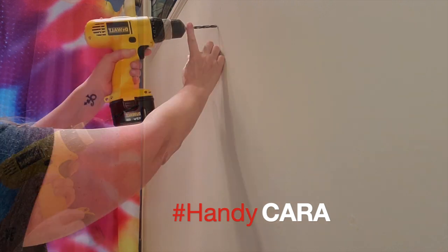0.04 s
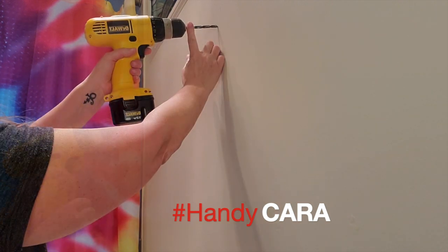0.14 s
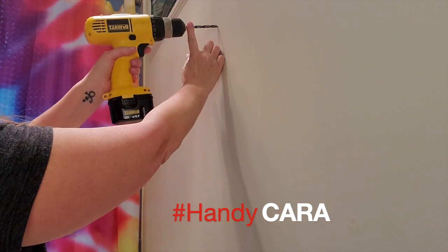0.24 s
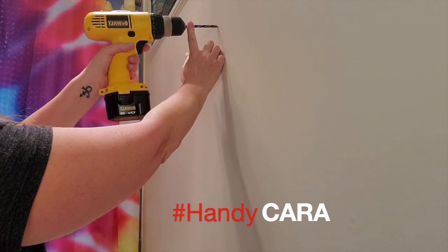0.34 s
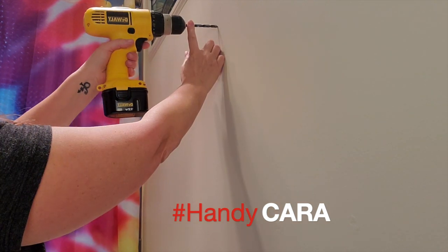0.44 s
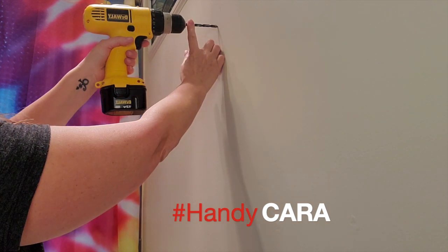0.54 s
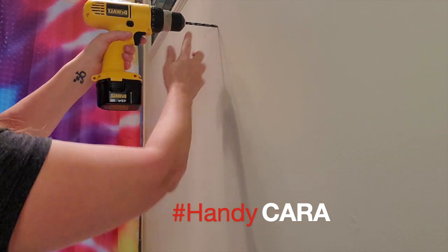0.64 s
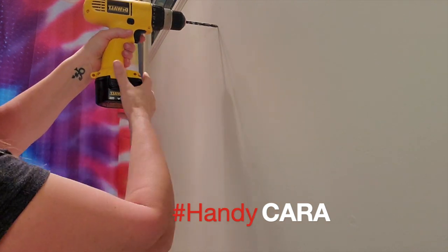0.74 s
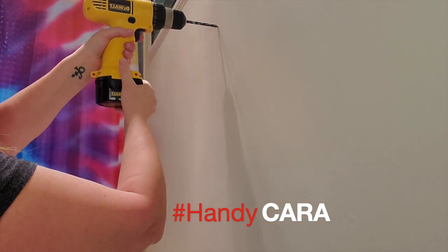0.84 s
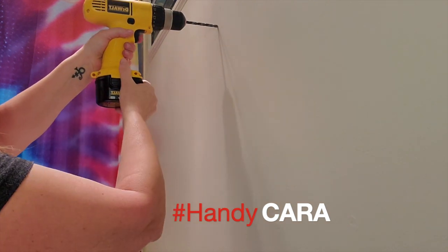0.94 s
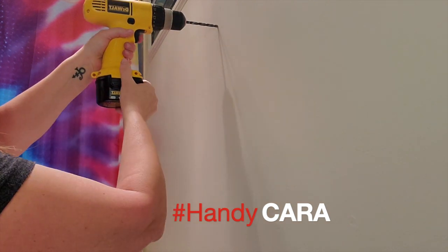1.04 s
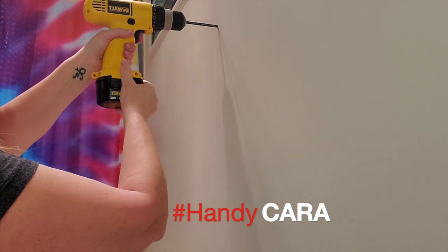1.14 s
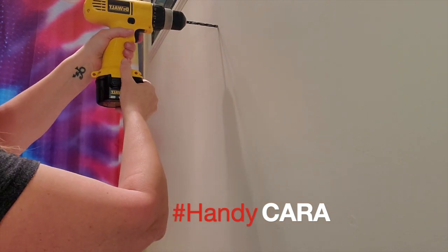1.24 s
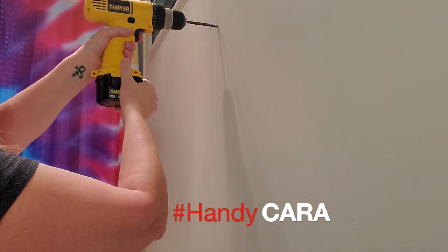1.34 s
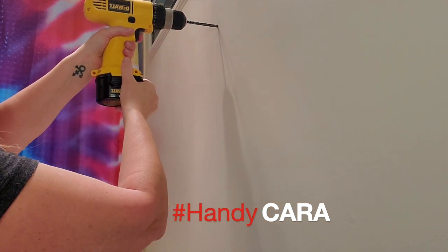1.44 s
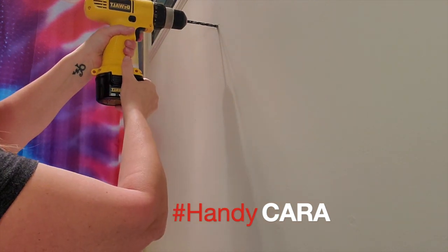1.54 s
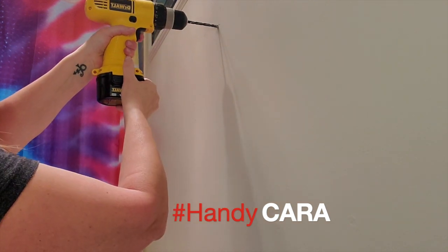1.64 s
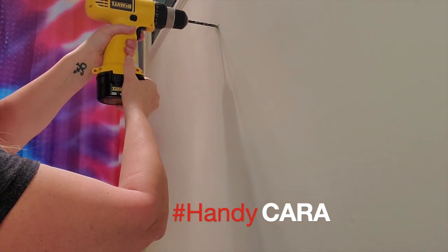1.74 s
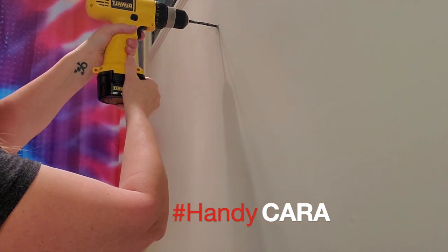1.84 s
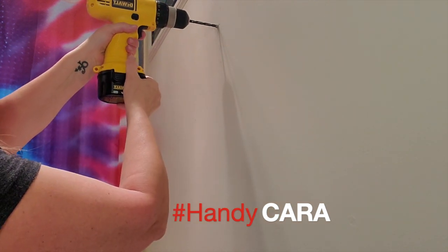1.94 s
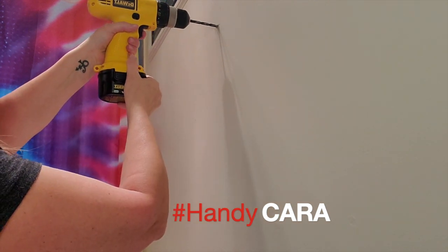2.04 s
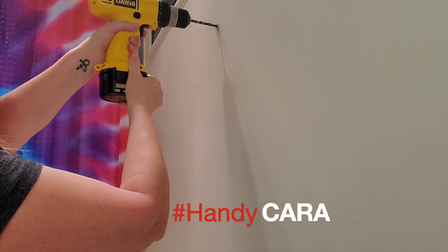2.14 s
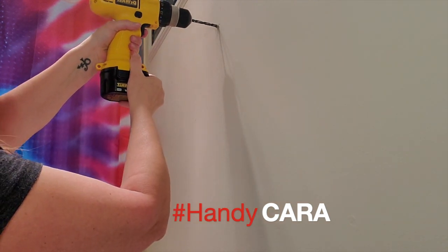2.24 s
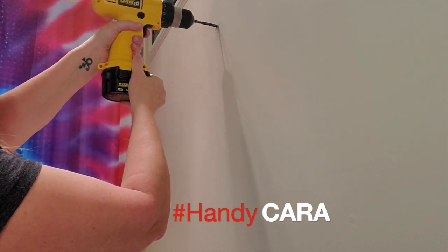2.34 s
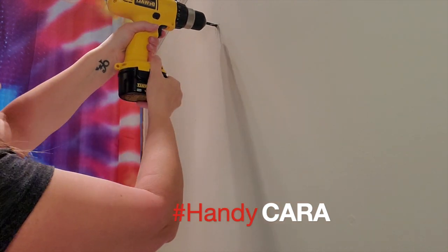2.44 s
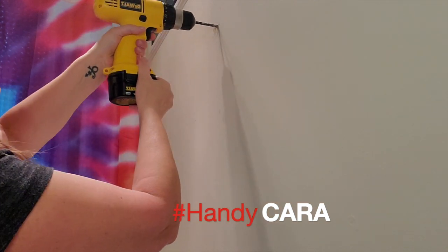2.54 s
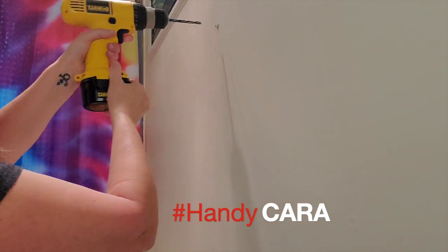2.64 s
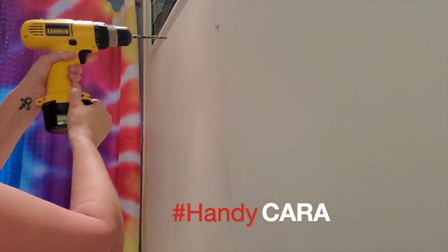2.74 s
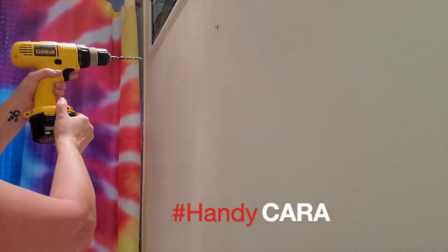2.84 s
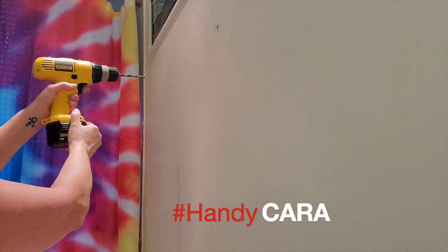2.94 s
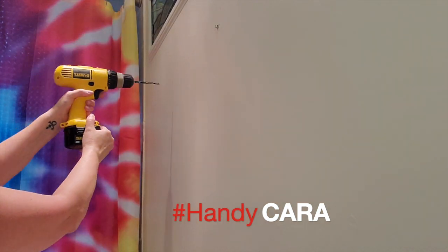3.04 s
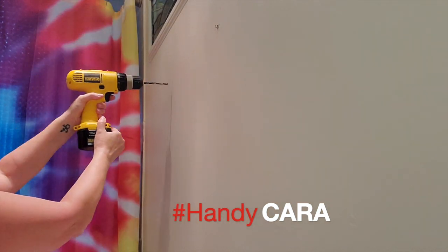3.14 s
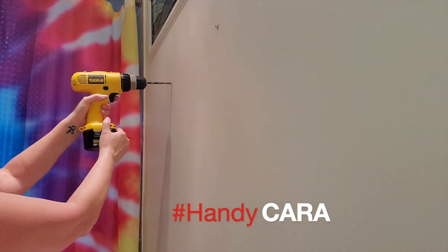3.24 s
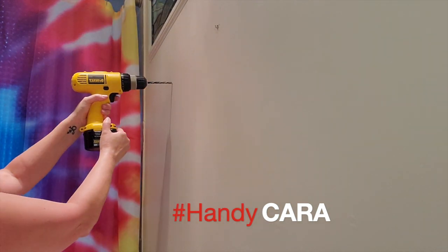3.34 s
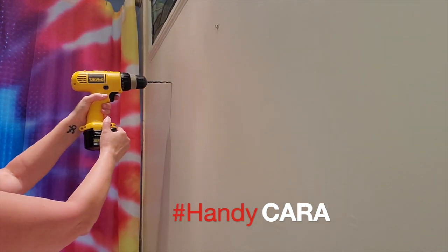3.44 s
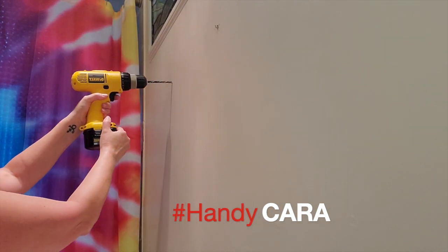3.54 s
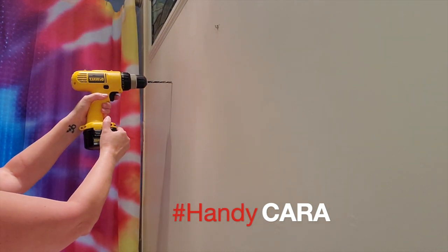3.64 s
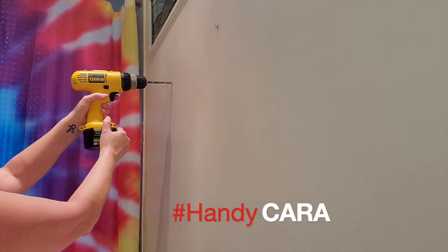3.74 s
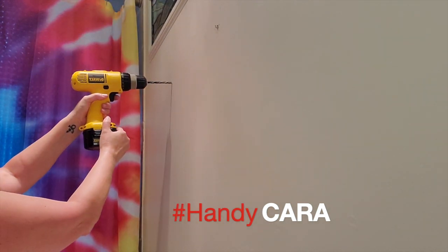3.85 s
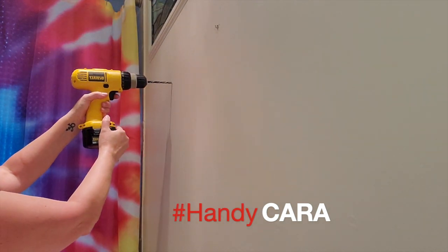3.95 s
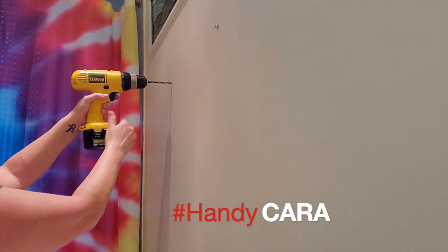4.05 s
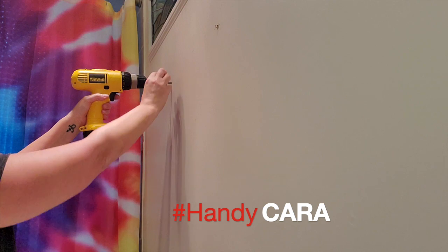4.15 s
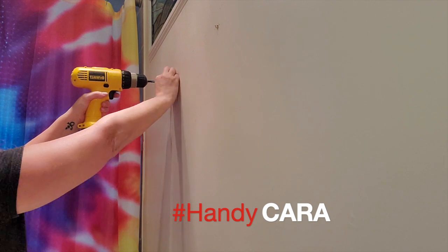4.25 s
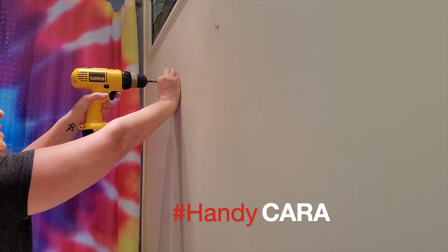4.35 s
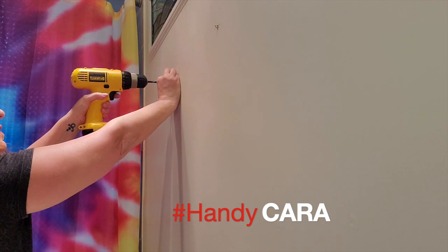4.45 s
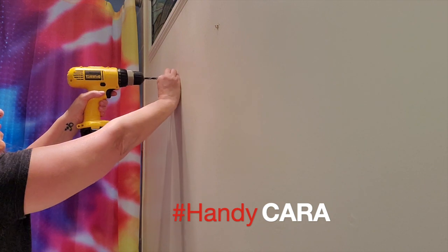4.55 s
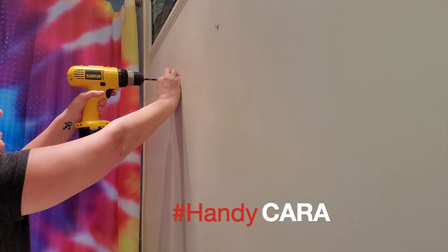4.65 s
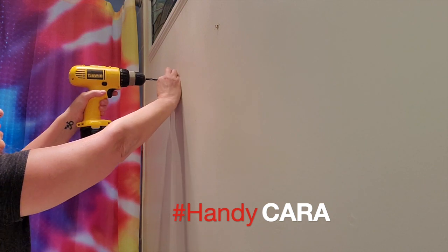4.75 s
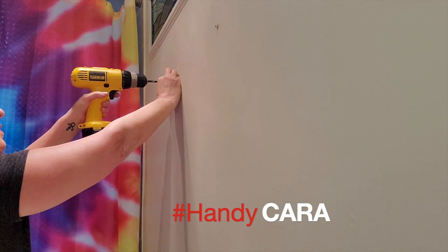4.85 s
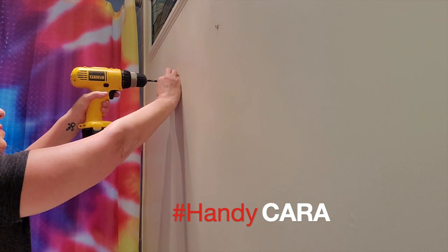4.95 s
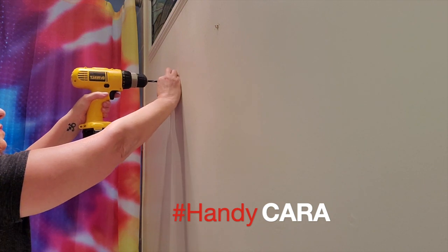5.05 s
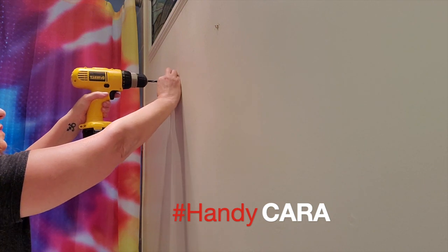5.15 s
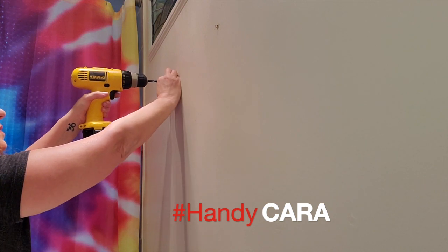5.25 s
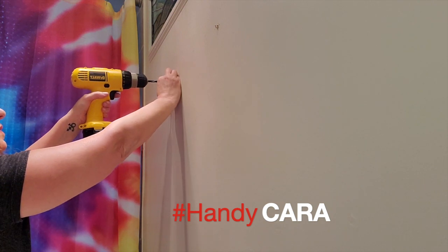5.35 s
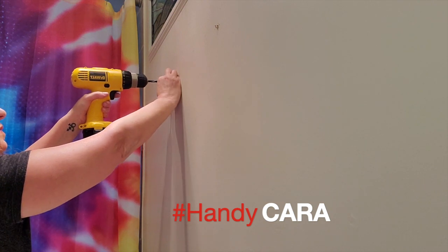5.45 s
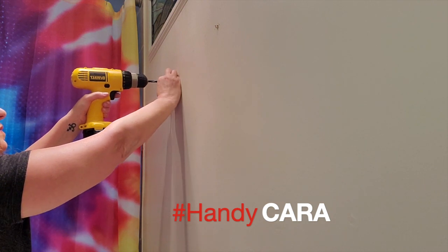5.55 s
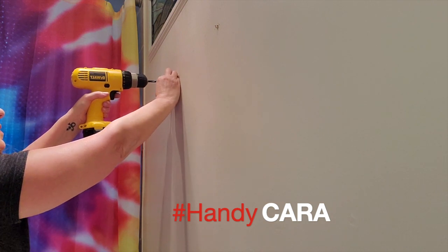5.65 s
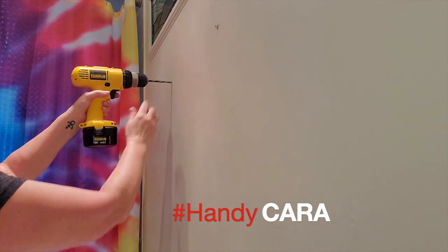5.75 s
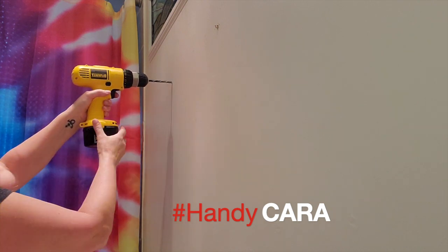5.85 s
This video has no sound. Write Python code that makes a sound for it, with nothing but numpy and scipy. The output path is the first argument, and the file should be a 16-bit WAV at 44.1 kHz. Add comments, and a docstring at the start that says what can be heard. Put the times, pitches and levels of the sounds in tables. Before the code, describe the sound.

In a small room, a cordless drill bores into plastic and stops, followed by hollow knocks, faint clicks and a small squeak.

```python
"""Small room: a cordless drill bores through a plastic sheet held against a wall.
The speed control whistles; fan, gears and shaft sing at multiples of the motor speed; dense tiny
impacts make the grinding. The sheet crunches, then judders as the bit breaks through. Shifted by hand,
it bumps the wall and rings, slides, and squeaks under a finger. The trigger is touched once more."""
import sys
import numpy as np
from scipy import signal
from scipy.fft import rfft, irfft
from scipy.io import wavfile
from scipy.ndimage import uniform_filter1d

SR = 44100
rng = np.random.default_rng(int(sys.argv[2]) if len(sys.argv) > 2 else 0)


def wrap_up_sound(samples):
    """Save the sound to the file named by the first command line argument, as 16-bit audio."""
    columns = np.atleast_2d(samples).T
    # keep every value between -1 and 1, then stretch to whole-number steps
    tamed = np.clip(columns, -1, 1)
    steps = np.round(tamed * 32767).astype(np.int16)
    wavfile.write(sys.argv[1], SR, steps)


N = 260537
T = np.arange(N) / SR
HZ = np.fft.rfftfreq(N, 1 / SR)

RUN_START_S, RUN_LENGTH_S, BRAKE_DB_PER_S = 0.828, 1.729, 660
BITE_LENGTH_S, PUSH_S, PUSH_RISE_S, THROUGH_S = 0.55, 1.9, 0.054, 2.38
START_HZ, CRUISE_HZ, GEAR_RATIO = 152.9, 376.6, 15.5
SQUEAK_S, SQUEAK_ATTACK_S = 4.694, 0.018
LOW_CUT_HZ, HIGH_CUT_HZ = 28, 15800

# Motor speed steps: t/s, target/Hz, lag/s
SPEED_STEPS = [(.83, 285.4, 0.16), (1.12, 369.1, 0.089), (1.63, 373.2, 0.061), (2.06, 411.5, 0.076),
               (2.38, 537.8, .035), (2.42, 385.7, 0.11)]
# Gear tones: order (multiple of motor speed), level/dB, offset before the bite/dB
GEAR_TONES = [(7.91, -14.5, -17), (9.95, -16, 6.5), (11.91, -1, 4.5), (12.66, 0, -2.5), (15.05, -10.5, -6),
              (22.1, -17, 12), (23.68, -6.5, 2), (24.93, 0, 5), (36.55, -6, -4), (39, -6, -1)]
# Tooth mesh: t/s, flutter/fraction of speed, gain above order 20/dB
GEAR_MESH = [(0.85, 0.008, -12), (1.33, 0.0057, -6.5), (1.45, 0.003, -2), (1.59, 0.0033, 1),
             (1.64, 0.0062, -6.5), (1.82, 0.0061, -2), (1.89, 0.0059, 2.5), (1.99, 0.0075, -8),
             (2.051, 0.0068, 0.5), (2.32, 0.006, 0.5), (2.43, 0.01, -8.5)]
# Planet wheel tones: order, level/dB
PLANET_TONES = [(0.87, -52.5), (1.74, -48), (2.6, -56.5), (3.25, -54.5), (3.46, -59.5)]
# Resonances of drill, bit and sheet: f/Hz, width/Hz, lift/dB
BODY_MODES = [(213.5, 37, 17.5), (690, 70, 6.5), (803, 32, 7), (996, 43, 6), (1190, 220, 7.5),
              (1557, 220, 10.5), (2497, 150, 8), (3650, 290, 5)]
# Housing resonances: f/Hz, width/Hz, lift/dB
HOUSING_MODES = [(221, 39, 9.5), (270, 35, 1.5), (407, 19, 10), (1295, 130, 19), (1662, 140, 23),
                 (2060, 140, 11.5), (2300, 150, 12)]
# Gear case resonances: f/Hz, width/Hz, lift/dB
GEAR_CASE_MODES = [(3900, 420, 8), (5080, 110, 9.5), (5960, 720, 0), (9100, 800, 7), (9900, 303, 9.5),
                   (10970, 650, 14.5), (11800, 500, 8.5), (14380, 400, 2.5)]
# Chuck and bit resonance: f/Hz, width/Hz, lift/dB
CHUCK_MODES = [(2557, 100, 14.5)]
# Cutting noise: f/Hz, level/dB
CUTTING_SPECTRUM = [(20, -30.5), (60, -43.5), (150, -7), (400, 5.5), (500, -8.5), (600, 6), (1300, -2),
                    (1900, -8.5), (2400, 3.5), (4200, 4.5), (5200, -1.5), (6100, -6), (6900, 1),
                    (7500, -0.5), (8400, 0.5), (10000, 0), (12300, -4.5), (14000, -1.5)]
# Grit and brush rasp: f/Hz, level/dB
GRIT_SPECTRUM = [(3000, -51), (5000, -2.5), (6200, 1.5), (6900, 8), (7500, -4), (8400, 5.5), (10500, 2),
                 (11100, 2), (12300, 0), (13500, 3), (14400, 4.5), (14800, -1.5), (15200, -5), (16000, 0.5)]
# Trigger half presses: t/s, initial f/Hz, level/dB
TRIGGER_PRESSES = [(0.774, 13140, -62), (5.832, 13360, -63)]
# Bit catching: t/s, length/s, level/dB
BIT_CATCHES = [(2.307, 0.054, -32.5), (2.477, 0.068, -35.5)]
# Chips breaking: t/s, length/s, level/dB, f/Hz, width/Hz
CHIP_BREAKS = [(1.04, 0.71, -49.5, 215, 90), (1.261, 0.043, -55, 270, 200), (1.388, 0.052, -45, 400, 900),
               (1.499, 0.046, -43, 220, 90), (1.549, 0.035, -42, 690, 260), (1.785, 0.034, -45.5, 230, 90),
               (2.02, 0.044, -44.5, 1100, 500)]
# Sheet modes: f/Hz, level/dB, t60/s
SHEET_MODES = [(118.7, -1, 0.13), (150.3, -4, 0.17), (188, -0.5, 0.12), (226.7, -7, 0.13),
               (324.7, -11.5, 0.19), (394.5, -2.5, 0.13), (587.6, -7.5, 0.14), (628, -14, 0.15),
               (802, -20, 0.11), (1043, -5, 0.039)]
# Sheet hitting wall: t/s, level/dB, hardness/dB, favoured f/Hz, pitch factor
WALL_BUMPS = [(0.059, -37, -3, 200, 1.08), (2.777, -51.5, 12.5, 400, 1.08), (2.9, -47, -20, 210, 0.93),
              (3.242, -31.5, 4, 400, 1.03), (3.338, -39, 6, 397, 1.015), (3.503, -32, 0, 556, 0.98),
              (3.725, -51.5, 5, 417, 0.99), (4.053, -46.5, -6, 400, 0.99), (4.188, -43.5, 9.5, 400, 0.98),
              (4.354, -41, -11, 395, 0.97), (4.414, -50.5, 5, 600, 1.02), (4.629, -44.5, 6.5, 500, 0.98),
              (4.828, -27.5, 2.5, 587, 1), (4.987, -36.5, -2, 210, 1)]
# Sheet sliding on wall: t/s, length/s, level/dB
WALL_SLIDES = [(2.62, 0.29, -72.5), (2.907, 0.15, -68), (3.03, 0.09, -56.5), (4.04, 0.35, -73)]
# Sliding hiss: f/Hz, level/dB
SLIDE_SPECTRUM = [(500, -8), (1500, -1), (4000, 10.5), (16000, 1)]
# Squeak resonances: f/Hz, width/Hz, level/dB
SQUEAK_MODES = [(1770, 1200, -4), (4580, 240, -4), (7000, 1400, -5), (9550, 1100, -14)]
# Fingertip landing: t/s, length/s, level/dB
FINGER_TOUCHES = [(4.09, 0.11, -68.5)]
# Grip shifts: t/s, length/s, level/dB
GRIP_SHIFTS = [(4.03, 0.082, -71), (4.2, 0.42, -66.5), (4.61, 0.037, -63)]
# Trigger and bit clicks: t/s, level/dB, tilt/(dB/octave)
PLASTIC_CLICKS = [(0.591, -63.5, -0.5), (0.704, -57.5, 3), (0.77, -49, 1), (2.973, -52.5, 3.5),
                  (3.239, -58, -2.5), (4.001, -56, 6), (4.021, -58, 3), (5.622, -61.5, 9),
                  (5.633, -51.5, -4), (5.845, -61, -1.5), (5.891, -58.5, 1.5)]
# Plastic click: f/Hz, level/dB
CLICK_SPECTRUM = [(200, 0.5), (450, 4.5), (2200, -4.5), (3800, -1), (7500, -11.5), (16000, -26)]
# Fingernail taps: t/s, f/Hz, level/dB
NAIL_TAPS = [(4.307, 1280, -61), (4.357, 1630, -61), (4.485, 1626, -53)]
# Room noise: f/Hz, level/dB
BACKGROUND_SPECTRUM = [(20, -13), (50, -10.5), (115, -5), (170, -10), (250, -20), (420, -24), (700, -23.5),
                       (3000, -27.5), (7000, -33.5), (16000, -45)]
# Room decay: f/Hz, t60/s
ROOM_DECAY = [(100, 0.27), (400, 0.25), (1500, 0.14), (6000, 0.1), (15000, 0.097)]
# Left-right likeness: f/Hz, correlation
STEREO_COHERENCE = [(100, 0.98), (600, 0.62), (1200, 0.34), (4000, 0.089)]
# Left over right: f/Hz, level/dB
STEREO_BALANCE = [(250, -0.5), (600, -0.2), (4500, 0.4), (8500, 1.5), (14000, 4)]


def motor_speed():
    """Turns per second; inertia lags behind trigger and load."""
    speed_hz = np.full(N, START_HZ)
    for at_s, target_hz, lag_s in SPEED_STEPS:
        gap_hz = speed_hz[round(at_s * SR)] - target_hz
        speed_hz = np.where(T < at_s, speed_hz, target_hz + gap_hz * np.exp(-since(at_s) / lag_s))
    return speed_hz


def run_gain(speed_hz, cruise_db, db_per_octave=0, push_db=0):
    """Gain of a drill part: on while running, rising with speed and hand pressure."""
    effort_db = db_per_octave * np.log2(speed_hz / CRUISE_HZ) + push_db * ramp(PUSH_S, PUSH_RISE_S)
    return amp(cruise_db + effort_db) * envelope(RUN_START_S, RUN_LENGTH_S, 0.022, BRAKE_DB_PER_S)


def bit_load():
    """0 to 1 as the bit sinks in, back to 0 at breakthrough."""
    return ramp(RUN_START_S, BITE_LENGTH_S) - ramp(THROUGH_S, 0.042)


def order_tone(turns, speed_hz, order, roughness):
    """Tone at a multiple of motor speed, unsteady in phase and level."""
    tone = np.cos(2 * np.pi * (order * turns + rng.random()) + roughness * drift(61))
    shimmer = (1 + roughness * drift(45)) * amp(roughness * 9.1 * drift(14))
    return np.sqrt(2) * tone * shimmer * (order * speed_hz < HIGH_CUT_HZ)


def motor_whine(speed_hz, turns):
    """Fan and gear tones swell as they cross resonances; the brushes rasp above."""
    mesh_s, mesh_flutter, mesh_db = np.transpose(GEAR_MESH)
    flutter = np.interp(T, mesh_s, mesh_flutter) * drift(129.3)
    upper_db = np.interp(T, mesh_s, mesh_db)
    # the bit binds once per chuck turn
    wobble = (0.0011 + 0.0055 * ramp(PUSH_S, PUSH_RISE_S)) * np.sin(2 * np.pi * turns / GEAR_RATIO)
    shaky_turns = turns + np.cumsum(speed_hz * (flutter + wobble)) / SR
    fan = amp(lift_db(5 * speed_hz, HOUSING_MODES)) * order_tone(shaky_turns, speed_hz, 5, 0.15)
    unloaded = 1 - ramp(RUN_START_S + 0.75 * BITE_LENGTH_S, 0.13)
    gears, rasp = np.zeros((2, N))
    for order, db, unloaded_db in GEAR_TONES:
        tooth_db = db + unloaded_db * unloaded + upper_db * (order > 20)
        case_db = lift_db(order * speed_hz, BODY_MODES) + lift_db(order * speed_hz, GEAR_CASE_MODES)
        gears += amp(tooth_db + case_db) * order_tone(shaky_turns, speed_hz, order, roughness=0.18)
    for order in range(14, 56):
        hz = order * speed_hz
        gain = amp(log_interp(GRIT_SPECTRUM, hz) + 3 * surges()) * (hz < HIGH_CUT_HZ)
        rasp += gain * np.cos(2 * np.pi * (order * shaky_turns + rng.random()))
    fan *= run_gain(speed_hz, -60.5, db_per_octave=14.5)
    gears *= run_gain(speed_hz, -48, db_per_octave=8.5, push_db=3) * unit(amp(1.94 * surges()))
    rasp = unit(rasp) * run_gain(speed_hz, -53, db_per_octave=5.5)
    return envelope(RUN_START_S, 1.72, 0.069, BRAKE_DB_PER_S) * (fan + gears + rasp)


def grinding(speed_hz, turns):
    """Tiny impacts of brushes, teeth and bit, bunched per motor turn, swelling per chuck turn."""
    swell_db = 1.12 * (np.cos(2 * np.pi * turns / GEAR_RATIO) + drift(54))
    bunching = (1 + 0.039 * np.cos(2 * np.pi * turns)) * amp(swell_db)

    def impacts(spectrum_db, spread_db):
        grains = noise() * amp(spread_db * np.minimum(rng.exponential(1, N), 4))
        return colour(grains * bunching, spectrum_db)
    cut = flicker(impacts(log_interp(CUTTING_SPECTRUM, HZ) + lift_db(HZ, BODY_MODES), spread_db=3))
    grit = impacts(log_interp(GRIT_SPECTRUM, HZ), spread_db=1.5)
    lows = irfft(rfft(cut) / (1 + (HZ / 1700) ** 8), N)
    low_gain = (0.59 + 0.41 * bit_load()) * amp(drift(12))
    cut = (cut - lows + low_gain * lows) * run_gain(speed_hz, -39, db_per_octave=11)
    return cut + grit * run_gain(speed_hz, -46.5, db_per_octave=5.5, push_db=4)


def shaft_hum(speed_hz, turns, roughness=0.09):
    """Low tones of shaft and planet wheels under load; they ease at breakthrough."""
    shaft = order_tone(turns, speed_hz, 0.997, roughness) * amp(lift_db(speed_hz, HOUSING_MODES))
    shaft *= run_gain(speed_hz, -52.5, push_db=2.5) * ramp(0.885, 0.038)
    shaft *= 1 - 0.5 * ramp(THROUGH_S, 0.038)
    planets = sum(amp(db) * order_tone(turns, speed_hz, order, roughness) for order, db in PLANET_TONES)
    return shaft + planets * ramp(1.03, 0.892) * bit_load()


def chuck_ring(speed_hz, turns, order=7):
    """Under load one order sings on a narrow metal resonance, breaking off when the bit slips."""
    contact = (1 + np.tanh(3 * (drift(32) + 0.9))) / 2
    chatter = 1 + 0.3 * drift(90)
    tone = order_tone(turns, speed_hz, order, roughness=0.064)
    gain = run_gain(speed_hz, -56.5) * amp(lift_db(order * speed_hz, CHUCK_MODES))
    return gain * ramp(1.1, 0.44) * bit_load() * contact * chatter * tone


def gear_kick():
    """The gears rattle as they take up slack at the start."""
    rattle = resonate(noise() * amp(2.5 * drift(120)), hz=2500, width_hz=170)
    return amp(-46.5) * envelope(0.843, 0.02, 0.0043, fall_db_per_s=134) * rattle


def trigger_whistle(slack_s=0.0078, travel_s=0.076, low_hz=9220, settled_hz=10600):
    """The speed control's switching tone falls and stutters with trigger travel, flares, recovers."""
    out = np.zeros(N)
    for at_s, first_hz, db in TRIGGER_PRESSES:
        travel = ramp(at_s + slack_s, travel_s - slack_s)
        recovery = 1 - np.exp(-since(at_s + travel_s) / 0.05)
        hz = first_hz + (low_hz - first_hz) * travel + (settled_hz - low_hz) * recovery
        flare_db = 12.5 * np.exp(-np.abs(T - at_s - travel_s) / 0.0089)
        gain = amp(db + flare_db + 10.5 * travel ** 4 + 4.8 * drift(70))
        gain *= envelope(at_s, travel_s, 0.01, fall_db_per_s=49)
        out += gain * np.sqrt(2) * np.sin(phase_rad(hz * (1 + 0.027 * drift(473))))
    return out


def judder(shake_hz=208, shove_delay_s=0.02):
    """The bit catches: the sheet shakes at its low resonance, then shoves the wall."""
    shake = np.sqrt(2) * np.sin(phase_rad(shake_hz * (1 + 0.075 * drift(37))))
    rattle = amp(-6.5) * resonate(noise(), 480, 620)
    shove = amp(-7) * resonate(noise(), 40, 21.5) + amp(-11) * resonate(noise(), 130.4, 67)
    force = sum(amp(db) * envelope(at_s, length_s, 0.048, fall_db_per_s=333.5)
                for at_s, length_s, db in BIT_CATCHES)
    return force * (shake + rattle) + shove * np.interp(T - shove_delay_s, T, force)


def crunches():
    """Chips break at the tip, each shaking the sheet around one pitch."""
    return sum(strokes([(at_s, length_s, db)]) * resonate(noise(), hz, width_hz)
               for at_s, length_s, db, hz, width_hz in CHIP_BREAKS)


def sheet_ring(t, swell, hardness_db, favoured_hz, tuning, decay_scale=0.67):
    """Sheet modes after a blow, peak 1; the spot struck sets the mix, hardness the treble."""
    modes = np.zeros(len(t))
    for hz, db, t60_s in SHEET_MODES:
        spot_db = 2.5 * rng.standard_normal() + 4 * np.exp(-(np.log2(hz / favoured_hz) / 0.47) ** 2)
        treble_db = hardness_db * np.clip(hz / 620 - 0.48, 0, 1)
        gain = amp(db + spot_db + treble_db - 60 * t / (decay_scale * t60_s))
        modes += swell * gain * np.sin(2 * np.pi * (hz * tuning * t + rng.random()))
    return modes / np.abs(modes).max()


def bumps(rise_s=0.0066, rebound_s=0.018, rebound_db=-8.5):
    """The sheet hits the wall, rings and rebounds; harder blows give more air slap, less wall thud."""
    out, t = np.zeros(N), T[:SR // 2]
    swell = 1 - np.exp(-(t / rise_s) ** 2)
    slap_band = signal.butter(3, [300, 1000], "band", fs=SR, output="sos")
    for at_s, db, hardness_db, favoured_hz, tuning in WALL_BUMPS:
        air = unit(signal.sosfilt(slap_band, noise(len(t))))
        slap = amp(-13 + hardness_db - 60 * t / 0.078) * air
        wall = np.sin(2 * np.pi * 55 * t) + np.sin(2 * np.pi * 110 * t)
        thud = amp(-17 - 0.59 * hardness_db - 60 * t / 0.46) * wall
        ring = sheet_ring(t, swell, hardness_db - 0.5, favoured_hz, tuning)
        rebound = sheet_ring(t, swell, hardness_db - 20, favoured_hz, tuning)
        add(out, at_s, amp(db) * (ring + swell * (slap + thud)))
        add(out, at_s + rebound_s, amp(db + rebound_db) * rebound)
    return out


def finger_squeak(start_hz=3300, sag_hz_per_s=3800):
    """A fingertip sings thinly on landing, then slips; the squeak sinks and fades as it slows."""
    slips = noise() * amp(2 * drift(95))
    landing = strokes(FINGER_TOUCHES) * resonate(slips, 3360, 390)
    hz = np.maximum(start_hz - sag_hz_per_s * since(SQUEAK_S), start_hz / 2)
    broad = resonate(slips, hz, width_hz=900)
    broad += sum(amp(db) * resonate(slips, mode_hz, width_hz) for mode_hz, width_hz, db in SQUEAK_MODES)
    broad *= amp(-58.5 - 30 * since(SQUEAK_S)) * envelope(SQUEAK_S, 0.24, SQUEAK_ATTACK_S, 170)
    core = amp(-60) * envelope(SQUEAK_S, 0.026, SQUEAK_ATTACK_S, 86) * resonate(slips, hz, width_hz=160)
    return landing + broad + core


def finger_chirp(start_hz=643, sag_hz_per_s=1460):
    """The first slips are regular: a short falling tone."""
    hz = np.maximum(start_hz - sag_hz_per_s * since(SQUEAK_S), start_hz / 2)
    phase = phase_rad(hz * (1 + 0.045 * drift(203)))
    gain = amp(-52.5) * envelope(SQUEAK_S, 2 * SQUEAK_ATTACK_S, SQUEAK_ATTACK_S, fall_db_per_s=381)
    return gain * (np.sin(phase) + 0.56 * np.sin(2 * phase))


def clicks(t60_s=0.091, attack_s=0.000073):
    """Hard plastic ticks: short bursts of shaped noise."""
    out, t = np.zeros(N), T[:4096]
    hz = np.fft.rfftfreq(len(t), 1 / SR)
    for at_s, db, tilt_db_per_octave in PLASTIC_CLICKS:
        spectrum_db = log_interp(CLICK_SPECTRUM, hz) + tilt_db_per_octave * np.log2((hz + 100) / 3000)
        burst = colour(noise(len(t)), spectrum_db)
        add(out, at_s, burst * amp(db + 3 - 60 * t / t60_s) * (1 - np.exp(-t / attack_s)))
    return out


def nail_taps(t60_s=0.025):
    """A nail rings the sheet's edge at one pitch, with a tiny snap."""
    out, t = np.zeros(N), T[:4096]
    for at_s, hz, db in NAIL_TAPS:
        snap = amp(-9 - 2000 * t) * noise(len(t))
        add(out, at_s, amp(db - 60 * t / t60_s) * (np.sin(2 * np.pi * hz * t) + snap))
    return out


def sheet_slides():
    """Friction hiss of the sheet along the wall."""
    return strokes(WALL_SLIDES) * colour(noise(), log_interp(SLIDE_SPECTRUM, HZ))


def palm_drag():
    """The dragging palm stirs the sheet's middle modes unevenly."""
    drag = noise() * amp(4.5 * drift(45))
    modes = sum(amp(db) * resonate(drag, hz, width_hz=160) for hz, db, _ in SHEET_MODES[3:8])
    return strokes(GRIP_SHIFTS) * unit(modes)


def background(rumble_db=-63, hiss_db=-73):
    """Room rumble, louder while the arms move, and a steady faint hiss."""
    def band(share):
        spectrum_db = log_interp(BACKGROUND_SPECTRUM, HZ) + 10 * np.log10(share + 1e-12)
        return stereo_pair(colour(noise(), spectrum_db), colour(noise(), spectrum_db))
    low_share = 1 / (1 + (HZ / 330) ** 6)
    moving = ramp(0.07, 0.66) - ramp(4.47, 0.084)
    rumble = amp(rumble_db + 3 * moving + 2 * drift(16.5)) * band(low_share)
    return rumble + amp(hiss_db) * band(1 - low_share)


def room(x, wet_db, early_db=3, early_s=0.0041, left_lag_s=0.00006):
    """Direct sound, near-wall reflections and a tail that dies band by band."""
    t = T[:SR // 2]
    taps = noise((2, len(t))) * (t > 0.002) * (1 + amp(early_db) * np.exp(-t / early_s))
    hz, frame_s, bands = signal.stft(taps, SR, nperseg=256)
    decay = amp(-60 * frame_s / log_interp(ROOM_DECAY, hz)[:, None])
    tail = signal.istft(bands * decay, SR, nperseg=256)[1]
    wet = signal.fftconvolve(x[None], tail / np.linalg.norm(tail[0]), axes=1)[:, :N]
    direct = rfft(x) * np.exp(-2j * np.pi * HZ * np.array([[left_lag_s], [0]]))
    wet_gain = amp(wet_db) * (HZ + 200) / (HZ + 900)  # bass stays drier
    mix = (direct + wet_gain * rfft(stereo_pair(*wet))) / np.sqrt(1 + wet_gain ** 2)
    balance = amp(log_interp(STEREO_BALANCE, HZ) * np.array([[0.5], [-0.5]]))
    return irfft(mix * balance, N)


def stereo_pair(a, b):
    """Two unrelated signals to left and right: alike in the bass, apart in the treble."""
    coherence = log_interp(STEREO_COHERENCE, HZ)
    left = rfft(a)
    right = coherence * left + np.sqrt(1 - coherence ** 2) * rfft(b)
    return irfft(np.array([left, right]), N)


def amp(db):
    return 10 ** (np.asarray(db) / 20)


def unit(x):
    """Scale to rms 1."""
    return x / np.sqrt(np.mean(np.abs(x) ** 2) + 1e-20)


def noise(shape=N):
    return rng.standard_normal(shape)


def phase_rad(hz):
    return 2 * np.pi * np.cumsum(hz) / SR


def log_interp(points, hz):
    """Interpolate (f/Hz, value) points over log frequency."""
    point_hz, values = np.transpose(points)
    return np.interp(np.log(hz + 1), np.log(point_hz + 1), values)


def add(mix, at_s, sound):
    part = mix[round(at_s * SR):][:len(sound)]
    part += sound[:len(part)]


def drift(rate_hz):
    """Low-passed noise, rms 1."""
    return unit(irfft(rfft(noise()) / (1 + (HZ / rate_hz) ** 4), N))


def surges(count=150):
    """Random swells, about one per chuck turn."""
    return np.interp(T, np.linspace(0, T[-1], count), noise(count))


def flicker(x, depth_db=3.5):
    """Patches of spectrum, a few hundred Hz by tens of ms, swell and sink at random."""
    bands = signal.stft(x, nperseg=512)[2]
    patches = uniform_filter1d(noise(bands.shape), size=4, axis=0)
    patches = uniform_filter1d(patches, size=6, axis=1)
    return unit(signal.istft(bands * amp(depth_db * unit(patches)), nperseg=512)[1][:N])


def colour(x, spectrum_db):
    """Shape the spectrum; rms 1."""
    return unit(irfft(rfft(x) * amp(spectrum_db), len(x)))


def resonate(x, hz, width_hz):
    """Steep resonance whose centre may glide; rms 1."""
    carrier = np.exp(1j * phase_rad(hz * np.ones(N)))
    pole = np.exp(-np.pi * width_hz / SR)
    return unit((carrier * signal.lfilter([1], [1, -2 * pole, pole * pole], x / carrier)).real)


def lift_db(hz, modes):
    """Combined gain of resonances at a frequency."""
    excess = sum((amp(db) ** 2 - 1) / (1 + (2 * (hz - mode_hz) / width_hz) ** 2) ** 2
                 for mode_hz, width_hz, db in modes)
    return 10 * np.log10(1 + excess)


def since(at_s):
    return np.maximum(T - at_s, 0)


def ramp(at_s, length_s):
    return np.minimum(since(at_s) / length_s, 1)


def envelope(at_s, length_s, attack_s, fall_db_per_s):
    return ramp(at_s, attack_s) * amp(-fall_db_per_s * since(at_s + length_s))


def strokes(rows):
    """Smooth swells from rows of t/s, length/s, level/dB."""
    out = np.zeros(N)
    for at_s, length_s, db in rows:
        add(out, at_s, amp(db) * signal.windows.tukey(int(length_s * SR), 0.5))
    return out


def scene():
    """Drill, bit and sheet, each from its own place in one room."""
    speed_hz = motor_speed()
    turns = np.cumsum(speed_hz) / SR
    whine = room(motor_whine(speed_hz, turns), wet_db=-2)
    drill = room(trigger_whistle() + gear_kick() + amp(-2.5) * grinding(speed_hz, turns), wet_db=4)
    bit = room(amp(-1) * grinding(speed_hz, turns), wet_db=2.5)
    near = room(shaft_hum(speed_hz, turns) + chuck_ring(speed_hz, turns) + judder(), wet_db=-11)
    sheet = room(bumps() + palm_drag() + crunches() + finger_chirp(), wet_db=-2)
    touches = room(clicks() + nail_taps() + finger_squeak() + sheet_slides(), wet_db=7.5)
    return whine + drill + bit + near + sheet + touches + background()


def record(dry):
    """Soft start, low cut, high cut."""
    low_cut = signal.butter(4, LOW_CUT_HZ, "high", fs=SR, output="sos")
    high_cut = signal.firwin(511, HIGH_CUT_HZ, window=("kaiser", 9), fs=SR)
    faded = dry * ramp(0, 0.0011) ** 2
    return signal.oaconvolve(signal.sosfilt(low_cut, faded), high_cut[None], "same")


dry = scene()
out = record(dry)
wrap_up_sound(out)
```